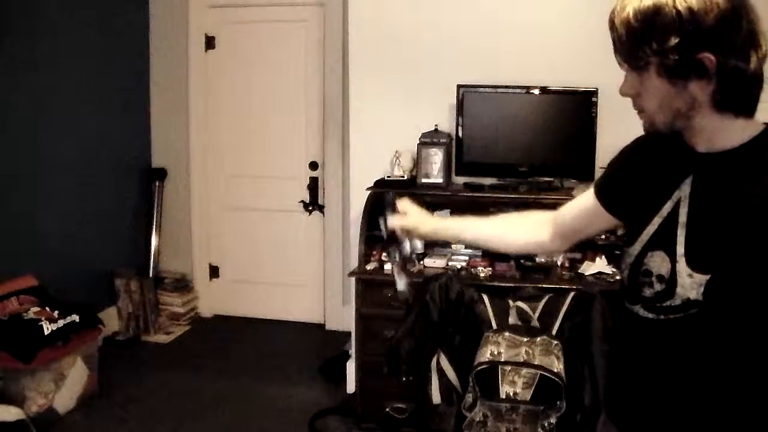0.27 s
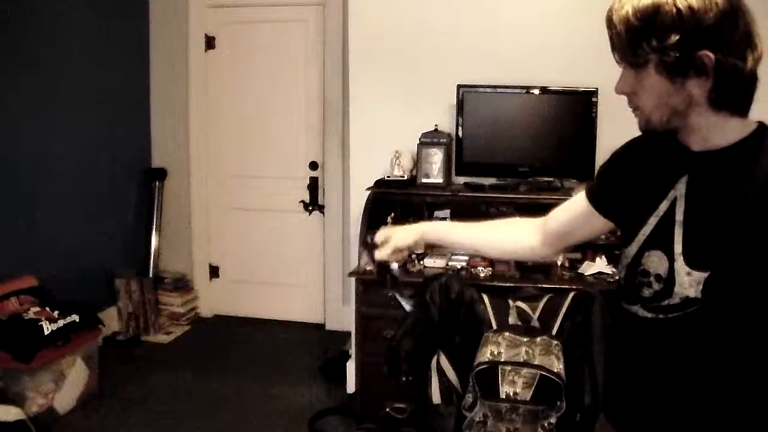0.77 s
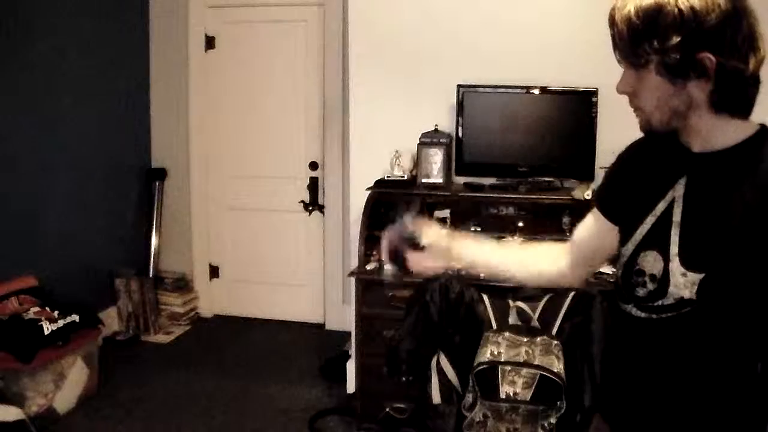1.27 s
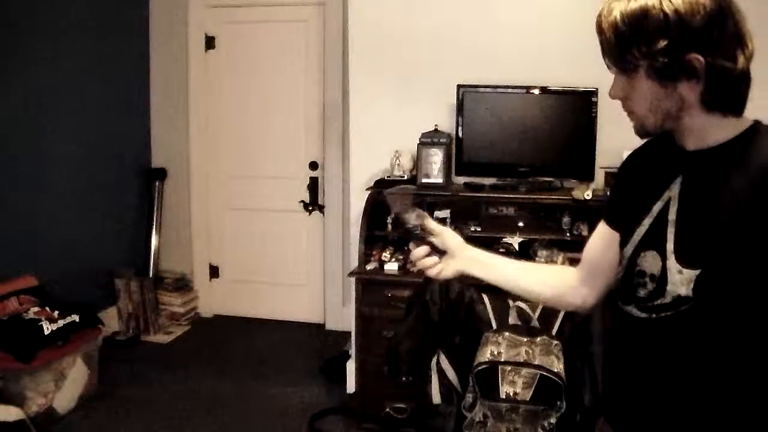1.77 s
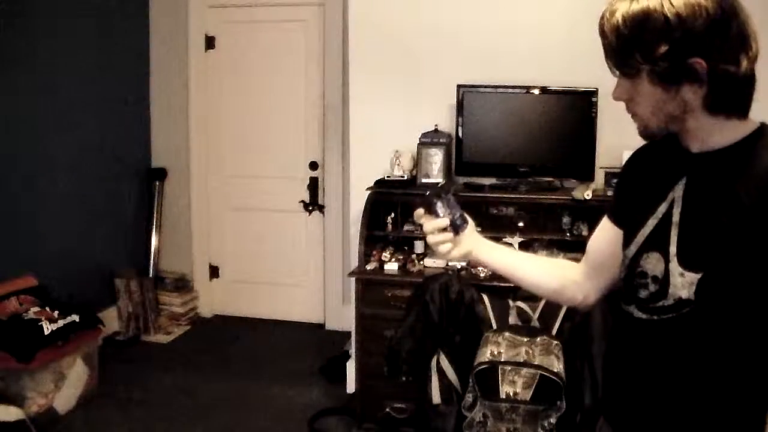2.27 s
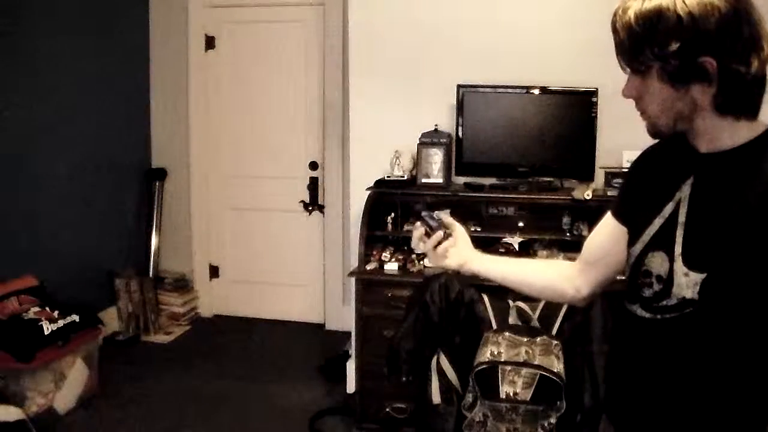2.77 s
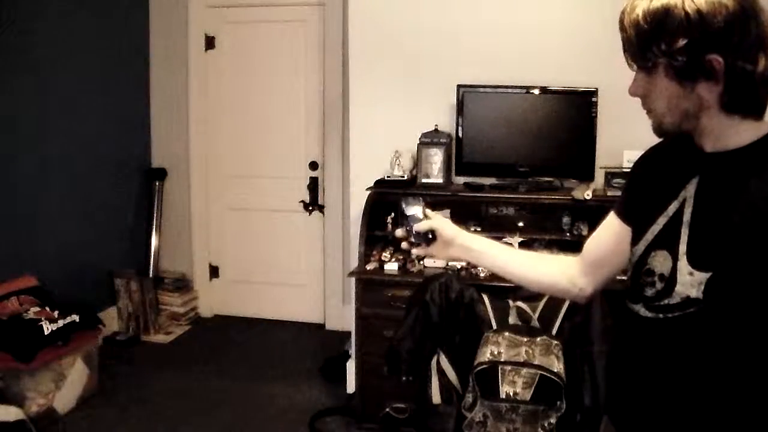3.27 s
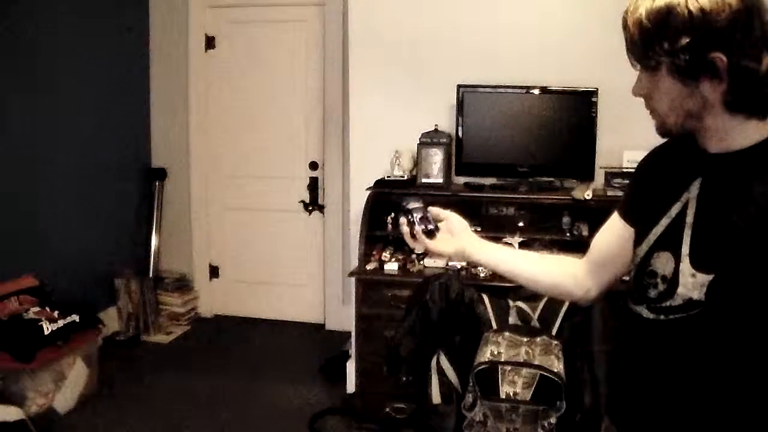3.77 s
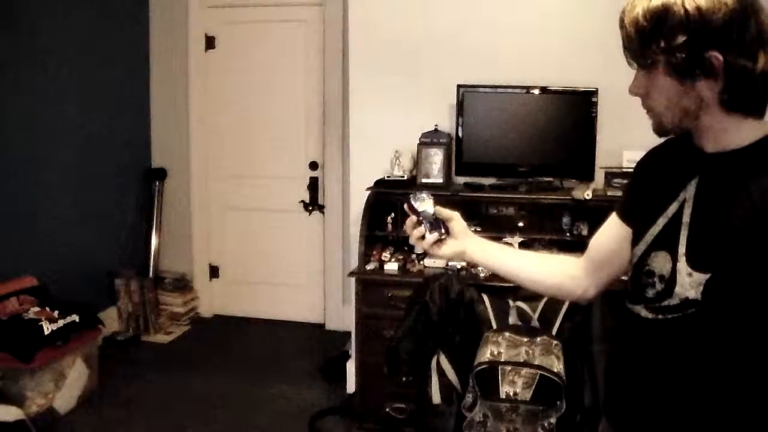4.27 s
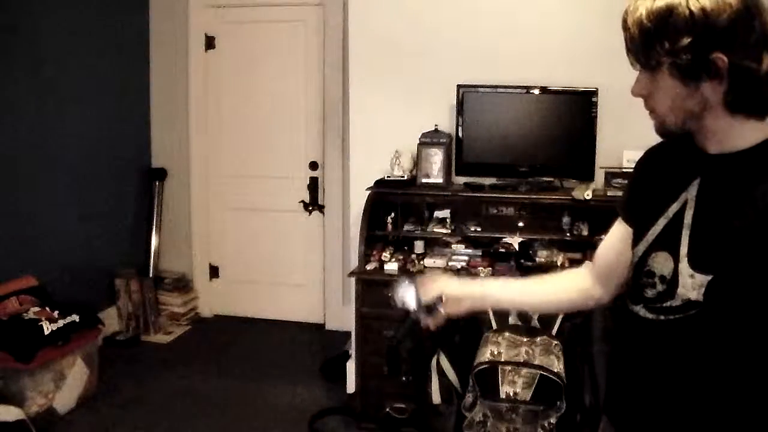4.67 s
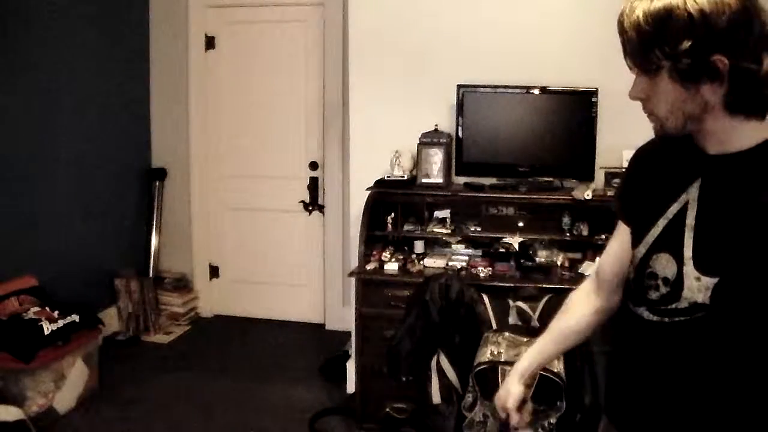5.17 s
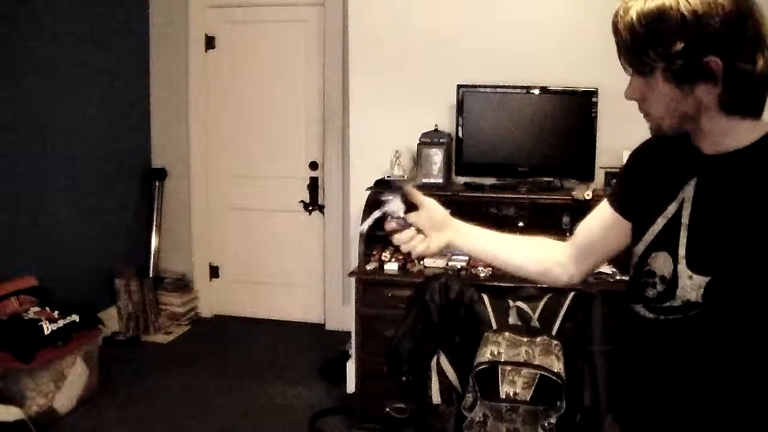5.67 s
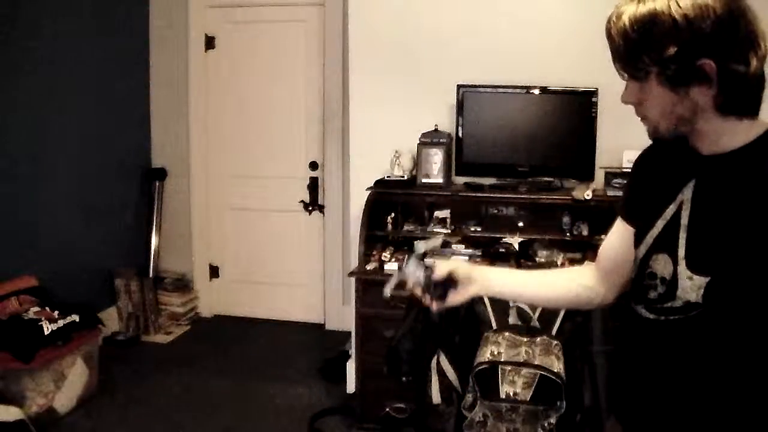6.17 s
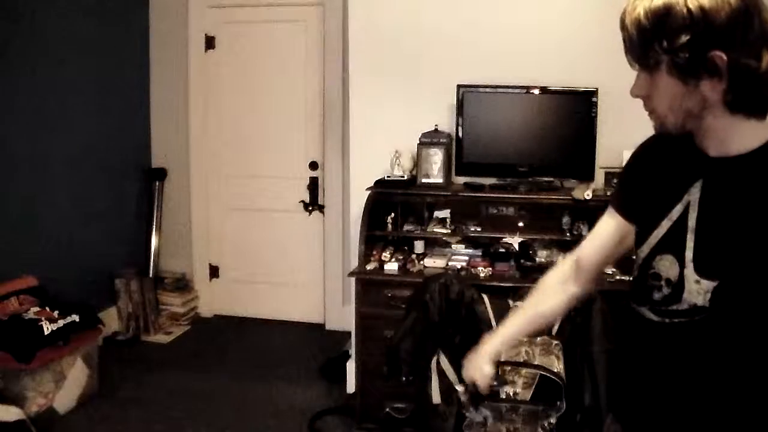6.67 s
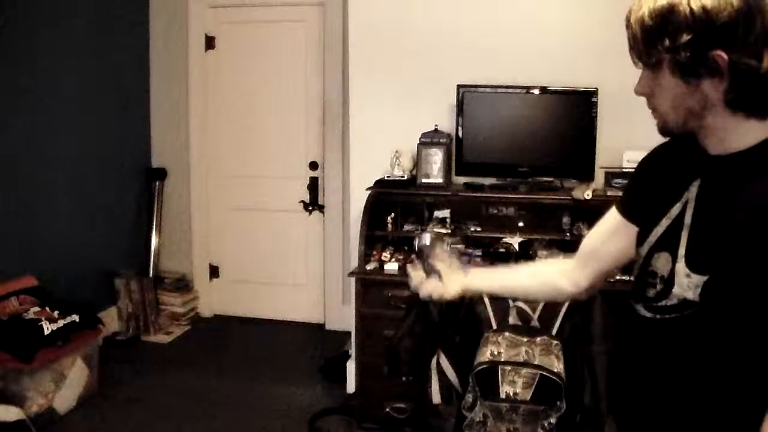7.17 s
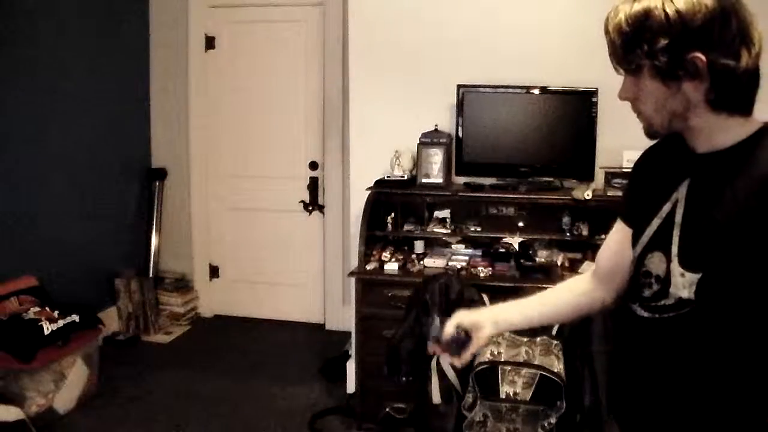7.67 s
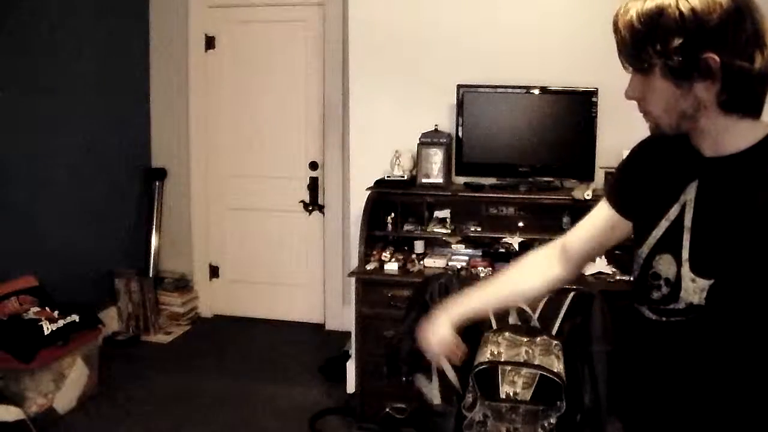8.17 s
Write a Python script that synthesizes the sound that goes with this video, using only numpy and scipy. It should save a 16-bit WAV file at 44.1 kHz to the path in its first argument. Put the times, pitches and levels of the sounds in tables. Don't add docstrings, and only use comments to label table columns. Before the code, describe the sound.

Steady low hum and soft fan-like air fill a furnished room, heard by a camera microphone about two metres from a hinged plastic toy. From 0 to 1 second its loose joints tick faintly. Around 1.3 seconds they chatter brightly, a snap lands at 1.6, and dense rattling leads to a hard double clack at 2.05; the background briefly dips and recovers. Small clicks come near 2.6, 2.9 and 4.1 seconds, with near quiet between. Sharp knocks fall at 4.8 and 4.9, followed by light rattling at 5.2 and 5.5. A quick run of clicks ends in the loudest, crackling clack at 5.9, and the sound drops under for half a second. Rattling builds from 6.9 to a strong snap at 7.3, with a rebound at 7.45. Thin ticks and a loose rattle finish around 8.2. Each hit is dry and bright, with short wall reflections.

```python
import sys
import numpy as np
from scipy import signal
from scipy.fft import rfft, irfft, next_fast_len
from scipy.io import wavfile
from scipy.ndimage import uniform_filter1d

SR = 44100
rng = np.random.default_rng(int(sys.argv[2]) if len(sys.argv) > 2 else 0)


def inscribe(sig):
    pcm = np.round(np.clip(np.atleast_2d(sig).T, -1, 1) * 32767)
    wavfile.write(sys.argv[1], SR, pcm.astype(np.int16))


def boost_factor(decibels):
    exponent = np.asarray(decibels, float) / 20
    return 10 ** exponent


N = 371322


def evened(x):
    return x / np.sqrt(np.mean(x ** 2) + 1e-20)


def peaked(x):
    return x / np.abs(x).max(axis=-1, keepdims=True)


def read(points, hz):
    f, value = np.transpose(points)
    return np.interp(np.log(hz + 1), np.log(f + 1), value)


def add(mix, s, sound):
    part = mix[round(s * SR):][:len(sound)]
    part += sound[:len(part)]


def resonate(x, hz, width):
    r = np.exp(-np.pi * width / SR)
    return 2 * signal.lfilter([1 - r], [1, -r * np.exp(2j * np.pi * hz / SR)], x).real


def dying(rows):
    out = np.zeros(N)
    for s, hz, db, t60 in rows:
        t = np.arange(0, 2 * t60, 1 / SR)
        onset = np.minimum(t * 4000, 1)
        add(out, s, boost_factor(db - 60 * t / t60) * np.cos(2 * np.pi * hz * t) * onset)
    return out


# frequency in Hz, level in dB per Hz.
AIR_COLOUR = [(12, -35), (20, 0.5), (54, -7), (163, -10), (261, -9), (308, -10), (520, -14), (614, -13.5),
              (724, -13.5), (787, -15.5), (1190, -18), (13500, -35), (14700, -36.5)]
# frequency in Hz, likeness from 0 to 1.
AIR_SAME = [(60, .7), (130, 0.53), (290, 0.82), (630, 0.8), (1370, 0.78), (2980, 0.23), (6510, 0.01),
            (14200, 0.03)]
# frequency in Hz, left minus right in dB.
AIR_BALANCE = [(60, 6), (110, 2.5), (200, 1), (370, -0.5), (680, -1.5), (1250, -0.5), (2300, -0.5),
               (4220, 0), (7750, 0), (14200, -1)]


def air():
    frames, hz = N // 512 + 5, np.fft.rfftfreq(2048, 1 / SR)
    a, b, c, d, patches = rng.standard_normal((frames, 1025, 5)).T
    patches = uniform_filter1d(patches, 16, axis=0)
    patches = evened(uniform_filter1d(patches, 6, axis=1))
    same = np.clip(read(AIR_SAME, hz), -1, 1)[:, None]
    left, other = a + 1j * b, c + 1j * d
    right = same * left + np.sqrt(1 - same ** 2) * other
    lean = boost_factor(read(AIR_BALANCE, hz)[:, None] / 2)
    z = np.array([left * lean, right / lean])
    z *= boost_factor(read(AIR_COLOUR, hz)[:, None] + 1.74 * patches)
    wash = signal.istft(z, nperseg=2048, noverlap=1536)[1][:, :N]
    return boost_factor(-53.5) * evened(wash)


# frequency in Hz, steady tone in dB, halo width in Hz, halo level in dB.
HUM = [(30.1, -53.5, 6.2, -66.5), (59.1, -57, 4, -62), (118.1, -60, 6, -72), (306, -98, 26, -65.5),
       (394.4, -89, 81, -63.5), (537, -99, 55, -68.5), (719.3, -65.5, 22.6, -69)]


def hum():
    t, noise = np.arange(N) / SR, rng.standard_normal(N)
    out = np.zeros(N)
    for hz, steady_db, width, halo_db in HUM:
        halo = resonate(resonate(noise, hz, width), hz, width)
        out += boost_factor(steady_db - 1.0) * np.sin(2 * np.pi * hz * t) + boost_factor(halo_db) * evened(halo)
    return out * boost_factor(np.array([[.9], [-.9]]))


# delay in ms, level in dB.
ECHOES = [(3.1, -6), (5.2, -10.5), (6.3, -26), (11.3, -7.5), (16.2, -51), (21.5, -9.5)]
# frequency in Hz, t60 in seconds.
ROOM_T60 = [(500, 0.3), (1500, 0.44), (3000, 0.42), (6000, 0.39), (12000, 0.2)]
# frequency in Hz, level in dB.
TAIL_COLOUR = [(700, 3.5), (1500, -7.5), (3000, -2.5), (6000, -3.5), (12000, 4.5)]
# frequency in Hz, extra level in dB.
TAIL_RIGHT = [(3000, 0.35), (8000, 1), (13000, 3.5)]


def room(x):
    taps = np.zeros((2, SR // 2))
    grid = np.arange(200, SR // 2 - 20, 20)
    at = grid + rng.integers(0, 20, (2, (SR // 2 - 201) // 20))
    np.put_along_axis(taps, at, rng.choice([-1., 1.], at.shape), 1)
    hz, t, z = signal.stft(taps, SR, nperseg=256)
    same = read([(1500, 0.94), (2500, 0.86), (4500, 0.2), (9000, 0.17)], hz)
    same = np.clip(same, 0, 1)[:, None]
    z[1] = same * z[0] + np.sqrt(1 - same ** 2) * z[1]
    z[1] *= boost_factor(read(TAIL_RIGHT, hz))[:, None]
    decay_db = read(TAIL_COLOUR, hz)[:, None] - 60 * t / read(ROOM_T60, hz)[:, None]
    tail = signal.istft(z * boost_factor(decay_db), SR, nperseg=256)[1]
    tail *= boost_factor(3.0) / np.linalg.norm(tail[0])
    lag = -0.15
    tail[0, 4] = 1
    tail[1, :9] = boost_factor(.8) * np.sinc(np.arange(9) - 4 - lag) * np.hanning(13)[2:11]
    for k, (ms, db) in enumerate(ECHOES):
        i = round(ms * SR / 1000)
        tail[0, i] += boost_factor(db)
        tail[1, i + (-1) ** k] += boost_factor(db)
    return signal.fftconvolve(x[None], tail, axes=1)[:, :N]


# start in seconds, drop in dB, hold in seconds, climb in seconds.
DUCKS = [
    (2.046, 13, 0.073, 0.18),
    (4.94, 1.5, 0.21, 0.24),
    (5.9044, 17.5, 0.41, 0.16),
    (7.286, 6, 0.2, .1),
    (7.461, 8.5, 0.24, 0.25),
]


def ducking_db():
    t, fall_s = np.arange(N) / SR, .003
    drops = [db * np.interp(t, [s, s + fall_s, s + hold, s + hold + climb], [0, 1, 1, 0])
             for s, db, hold, climb in DUCKS]
    return np.max(drops, axis=0)


# start in seconds, peak in dB.
PUSHES = [
    (1.5686, -40),
    (2.0469, -15),
    (4.8249, -48),
    (4.9264, -51),
    (5.9052, -28),
    (7.2866, -47),
    (7.4512, -42),
]


def pushes():
    return dying([(s, 750, db, .004) for s, db in PUSHES])


# start in seconds, length in seconds, level in dB,
# growth over the swing in dB, ringing of the open arms in dB.
SWINGS = [(0, 0.46, -59.5, -4, 5.5), (0.278, 0.098, -51.5, -4, 5), (.4, .18, -64, -1, 6),
          (.62, 0.077, -69.5, 10.5, 7), (0.825, 0.14, -49.5, -1, -2), (1.268, 0.15, -38.5, 4.5, -5),
          (1.453, 0.11, -45.5, 0.5, -3.5), (1.554, .24, -40, -0.5, -6.5), (1.82, 0.18, -42.5, -1.5, -5),
          (2.001, .13, -38.5, -0.5, -5), (4.74, .03, -62, -14, 0), (4.88, .07, -76, 8, -3),
          (5.22, 0.098, -65.5, 11, 9.5), (5.29, .17, -49, -13, 0.5), (5.48, 0.2, -60, 5, 2),
          (5.75, 0.16, -58, 14.5, -3), (6.868, 0.39, -68, 25.5, -2), (7.361, 0.04, -53, 12, -8),
          (7.72, 0.64, -65.5, 9.5, -7), (8.148, 0.064, -45, 2.5, -3)]
# frequency in Hz, level in dB per Hz.
RATTLE_COLOUR = [(470, -32.5), (800, -12), (1330, 3), (2280, -5.5), (2640, 7.5), (5820, 4.5), (8390, -4.5),
                 (11800, -5), (14200, -16.5), (14700, -29.5)]
# frequency in Hz, level in dB.
ARMS = [(2640, 0.5), (2830, 3), (3300, -1.5), (3750, -0.5), (4720, -1.5), (5050, -3.5), (5850, -0.5),
        (7300, -6)]


def rattle():
    rise_s, fall_s = 0.0065, 0.0067
    level, ringing = np.zeros((2, N))
    for s, length, db, growth_db, ring_db in SWINGS:
        t = np.arange(0, length + fall_s, 1 / SR)
        swing = np.clip(np.minimum(t / rise_s, t[::-1] / fall_s), 0, 1)
        swing = swing * boost_factor(db + growth_db * t / length)
        add(level, s, swing)
        add(ringing, s, swing * boost_factor(ring_db))
    sizes = boost_factor(3.4 * np.minimum(rng.exponential(1, N), 4))
    struck = rng.random(N) < 1600 / SR
    ticks = sizes * struck * rng.choice([-1, 1], N)
    size = next_fast_len(N)
    colour = boost_factor(read(RATTLE_COLOUR, np.fft.rfftfreq(size, 1 / SR)))
    plain = irfft(rfft(ticks, size) * colour, size)[:N]
    arm = np.arange(N) % len(ARMS)
    rung = sum(boost_factor(db) * resonate(ticks * (arm == k), hz, 160) for k, (hz, db) in enumerate(ARMS))
    return boost_factor(ducking_db() - 12) * (level * evened(plain) + ringing * evened(rung))


# start in seconds, frequency in Hz, peak in dB.
PINGS = [(1.2807, 5050, -43), (1.3024, 3700, -39), (1.3351, 4820, -38), (1.3496, 4740, -41),
         (1.3605, 4910, -32), (1.383, 6980, -36), (1.3917, 4650, -36), (1.405, 3880, -38),
         (1.4069, 2700, -40), (1.4077, 5040, -39), (1.568, 7240, -32), (1.5692, 4240, -29.5),
         (1.6377, 5640, -39), (1.8249, 7440, -35), (1.9983, 3530, -31), (2.0034, 6030, -35),
         (2.0114, 2840, -35), (2.0331, 5680, -36), (2.0455, 6290, -31), (2.0745, 5940, -40),
         (2.1028, 2640, -32), (2.6289, 4070, -40), (2.8517, 4570, -41), (2.856, 6720, -33),
         (2.8662, 4650, -42), (2.8669, 3380, -39), (2.8712, 6890, -44), (2.8821, 5920, -39),
         (4.099, 5800, -47), (4.1525, 8960, -45), (4.1687, 2500, -36), (4.792, 5040, -32),
         (4.8268, 7200, -37), (4.8326, 3100, -37), (4.8529, 5800, -44), (4.9255, 4530, -30.5),
         (4.9259, 2480, -28), (4.9465, 2670, -44), (4.9538, 4700, -46), (5.2152, 7540, -42),
         (5.2883, 4740, -41), (5.3057, 2580, -44), (5.8579, 5870, -30), (5.8819, 7400, -33),
         (5.8848, 4910, -34), (5.8862, 3620, -36), (5.8891, 2580, -38), (5.9034, 7600, -31),
         (5.9232, 5250, -35), (5.9239, 2500, -35), (5.9247, 3360, -35), (7.2039, 8870, -42),
         (7.2214, 2760, -36), (7.2961, 2500, -37), (7.3055, 5340, -36), (7.3694, 2580, -37),
         (7.4507, 2350, -29), (7.4688, 2410, -38), (7.4813, 2240, -39), (8.1654, 5860, -38)]
# start in seconds, frequency in Hz, peak in dB.
FAINT_PINGS = [(0.1487, 2840, -47), (0.2336, 2760, -47), (0.325, 2835, -43), (0.3424, 2840, -45),
               (0.498, 3190, -51), (0.535, 2840, -45), (0.8939, 7240, -54), (0.9019, 3030, -45),
               (0.9237, 5860, -53), (0.952, 3880, -49), (0.9534, 3100, -48), (1.2741, 5030, -42),
               (1.277, 6630, -46), (1.2792, 5680, -46), (1.2843, 5770, -43), (1.2988, 8700, -46),
               (2.0346, 7410, -42), (2.6282, 7150, -55), (2.634, 8870, -54), (2.6419, 3350, -51),
               (2.6637, 4130, -53), (2.88, 7670, -51), (2.8887, 2580, -41), (2.8908, 6800, -50),
               (2.9808, 4910, -50), (2.9808, 5860, -49), (4.0751, 2760, -39), (4.1012, 6980, -51),
               (4.1716, 7580, -52), (4.956, 2070, -46), (5.2121, 2660, -44), (5.2368, 2650, -47),
               (5.2382, 8010, -57), (5.3079, 4740, -46), (5.552, 2670, -46), (5.5517, 5860, -53),
               (5.5916, 7490, -54), (5.6047, 3880, -48), (5.9312, 8440, -47), (6.9115, 5170, -53),
               (6.913, 4480, -53), (7.0046, 3080, -45), (7.0117, 2650, -46), (7.1314, 6120, -45),
               (7.3084, 7580, -43), (7.4673, 7410, -50), (8.1487, 3880, -47), (8.1618, 7410, -54),
               (8.214, 2830, -48), (8.2191, 4650, -49)]


def pings():
    hard = [(*row, 0.024) for row in PINGS]
    faint = [(*row, 0.035) for row in FAINT_PINGS]
    return boost_factor(ducking_db()) * dying(hard + faint)


# start in seconds, frequency in Hz, peak in dB, t60 in seconds.
TONES = [(.325, 2800, -45, .06), (.94, 5780, -43, .04), (1.569, 1255, -32, 0.018), (1.825, 5820, -40, .06),
         (2.05, 3480, -14, 0.033), (2.621, 4900, -46, .015), (2.628, 3990, -39, .022),
         (2.849, 2240, -28, 0.018), (2.9572, 2040, -26, 0.012), (2.958, 3340, -36, 0.033),
         (4.082, 5790, -33, 0.032), (4.152, 3200, -29, 0.015), (4.1523, 2320, -22.5, 0.0085),
         (4.154, 5860, -29.5, .018), (4.793, 1850, -28.5, .016), (4.803, 5800, -36, .015),
         (4.826, 5600, -27, .016), (4.826, 4970, -29, .016), (4.9265, 2080, -24.5, .008),
         (4.9292, 1800, -27, .008), (4.9292, 4200, -31, .008), (5.536, 2990, -41, .02),
         (5.872, 4550, -26.5, 0.038), (5.9047, 2380, -7.5, 0.0078), (7.1, 3200, -37, .012),
         (7.2862, 3400, -18, .01), (7.2862, 4700, -24, .008), (7.287, 1510, -29.5, .008),
         (7.307, 2680, -20, .013), (7.315, 2650, -27, .014), (7.4513, 1880, -19.5, 0.014),
         (7.452, 5800, -23, .04), (8.148, 5790, -39.5, .08)]


def arm_tones():
    return dying(TONES)


# frequency in Hz, level in dB.
SHELL = [(2050, -35), (2690, 0), (3500, -4.5), (4650, -6), (5100, 4), (5810, 6), (7200, -22), (9900, 4)]
# lower edge in Hz, upper edge in Hz.
PARTS = [(1380, 2350), (2350, 4200), (4200, 7500), (7500, 15000)]


def clack(bounces, knock_db, panel_db, edges_db, chance):
    shell_t60 = .016
    weights = boost_factor(3 * chance[:, :len(SHELL)].T)
    ring = sum(w[:, None] * boost_factor(db) * resonate(bounces, hz, 6.1 / shell_t60)
               for w, (hz, db) in zip(weights, SHELL))
    shaken = bounces + boost_factor(-3.5) * ring
    gains = boost_factor(knock_db), -np.ones(len(bounces)), boost_factor(panel_db), -boost_factor(edges_db)
    out = 0
    for gain, band in zip(gains, PARTS):
        part = signal.lfilter(*signal.butter(N=2, Wn=band, btype="band", fs=SR), shaken)
        out = out + gain[:, None] * peaked(part)
    return out


# start in seconds, body peak in dB, then hollow knock,
# bright panel and thin edges in dB against the body.
SNAPS = [(1.2743, -43, -13, 11, 17.5), (1.382, -28.5, -10, 3, 5.5), (1.5687, -26.5, -10, 6, 7.5),
         (1.9984, -26, -12.5, -1, -5), (2.0434, -16.5, -1.5, -12, -5), (2.0469, -11, -4.5, 0.5, -2),
         (2.8439, -38.5, 8, -15, -15), (2.8483, -36, 1, 9, -1), (2.957, -30.5, 2, -5, -6),
         (4.1513, -26.5, -8, -8, -7), (4.7930, -27.5, -11, 3, -10), (4.8249, -25.5, 3, 1.5, -3),
         (4.9259, -23.5, -6, 4.5, -1), (4.9317, -30.5, 3.5, 5, 12), (5.2030, -33, -4, -9, -22),
         (5.5348, -29.5, -25, -10, -7.5), (5.9047, -10.5, -18, -1.5, -5), (6.9973, -34, -7, -0.5, -3),
         (7.2862, -12.5, -8, -10, -4.5), (7.3080, -23.5, -12, -5, -15), (7.4513, -24.5, -29, 2.5, -1.5),
         (7.5393, -41, 8, -4, -10)]


def snaps():
    ms, bounce_ms = np.arange(2048) * 1000 / SR, 0.74
    start_s, peak_db, knock_db, panel_db, edges_db = np.transpose(SNAPS)
    shake, chance = np.moveaxis(rng.standard_normal((len(SNAPS), 2, 2048)), 1, 0)
    blows = (ms == 0) + 0.3 * shake ** 3 * np.exp(-ms / bounce_ms)
    return start_s, peak_db, clack(blows, knock_db, panel_db, edges_db, chance)


# start in seconds, body peak in dB, hollow knock in dB against
# the body, brightness in dB against the body.
CHATTER = [(.146, -54, -8, 2), (.173, -55, -13.5, -7), (.21, -43, -26, -13), (0.217, -43, -23, -1.5),
           (0.273, -42, -15, -3), (.286, -42.5, -18, 1.5), (.323, -39.5, -9, -6),
           (0.432, -41.5, -24, -5.5), (.481, -51, -28, 1.5), (.52, -39, -14, -9),
           (0.645, -49.5, -15, -26), (0.836, -49, -25, -15), (.845, -55, -17, -5),
           (.894, -39.5, -17, -4), (0.939, -42, -28, -3), (1.297, -33, -26, -0.5), (1.307, -40, -19, -5),
           (1.335, -38, -20, 3), (1.359, -31, -8, -4), (1.385, -35, -29, 1), (1.397, -27, -8, -5),
           (1.415, -39.5, -22, 6), (1.528, -57, -13, -6),
           (1.57, -34, -0.5, 5), (1.61, -29, -21, -6), (1.644, -40, -24, -2), (1.692, -31.5, -27, -3),
              (1.699, -36, -26, 3.5), (1.726, -35, -9, 2), (1.731, -26.5, -26, -2.5),
              (1.745, -45, -13, 13.5), (1.774, -56, -8, -2), (1.823, -41, -10, 11), (1.923, -41.5, -22, 0),
              (2, -30, -6, 5.5), (2.058, -23.5, -28, -20), (2.074, -24.5, -11.5, -36),
              (2.627, -39.5, -14, -4.5), (2.699, -50, -2, 2), (2.854, -33.5, 2, 3.5),
              (2.861, -37, -12, -15), (2.966, -41.5, -23, -5), (3.649, -44.5, -2, -21),
              (3.748, -50.5, 1, -11), (3.778, -54.5, 6, -13), (3.94, -53.5, -1, -21),
              (4.07, -41.5, 0.5, -5), (4.079, -38, -1, 0.5), (4.098, -41.5, 6, -8), (4.154, -38, 7.5, 2.5),
              (4.26, -40.5, -9, -12),
           (4.747, -54.5, 5, 8), (4.773, -56, 5, 6), (4.798, -51, 5, -4), (4.826, -43.5, -10, 12),
                  (5.148, -53, -1, -6), (5.212, -42, -1, 5.5), (5.289, -37, -10, -1),
                  (5.381, -43.5, -27, -9), (5.515, -51, -12, -6), (5.527, -47, -20, -10),
                  (5.593, -36, -15, -6), (5.751, -52.5, -9, 1.5), (5.81, -41, -14, -1),
                  (5.8556, -33, 0, 10.5), (5.873, -32, -3.5, 6), (5.884, -33, -14, 11),
                  (5.897, -30, -10.5, 4), (5.908, -31.5, 0.5, 1.5), (6.516, -50.5, -10.5, -5),
                  (6.539, -48, -17, -1), (6.751, -49.5, -16, -9),
           (6.911, -43.5, -16, 0.5), (7.0997, -39, -32, -11), (7.129, -40, -7, 0.5),
             (7.172, -37, -17, -9), (7.182, -36.5, -9, -4.5), (7.2, -36, -16, 0.5), (7.209, -30, -16, -18),
             (7.225, -44, -13, -2), (7.257, -54, -10, -7), (7.294, -41, -7, 5), (7.315, -35.5, 1.5, -6),
             (7.434, -48, -6, 3), (7.467, -40, -16, -2), (7.483, -41.5, 2.5, 0), (7.616, -58, 5.5, 1.5),
             (7.715, -58.5, -1, 8), (7.743, -58.5, 2, 1), (7.814, -51.5, -5, -4), (7.833, -58, -11, -3),
             (7.853, -49, -19, -3), (7.874, -57, -2, -4), (8.146, -37.5, -5.5, -3.5), (8.154, -43, -22, -6),
             (8.171, -37, -24, -11), (8.379, -56, -4, -9)]


def chatter():
    ms, bounce_ms = np.arange(2048) * 1000 / SR, 2.46
    start_s, peak_db, knock_db, bright_db = np.transpose(CHATTER)
    shake, chance = np.moveaxis(rng.standard_normal((len(start_s), 2, 2048)), 1, 0)
    u = ms / bounce_ms
    bounces = shake * abs(shake) * u ** 0.85 * np.exp(-u)
    return start_s, peak_db, clack(bounces, knock_db, bright_db, bright_db, chance)


def clacks():
    out, lift = np.zeros(N), boost_factor(ducking_db())
    for blows in (snaps(), chatter()):
        for s, db, sound in zip(*blows):
            add(out, s, boost_factor(db) * lift[round(s * SR)] * sound)
    return out


def scene():
    toy = rattle() + pings() + arm_tones() + clacks()
    return air() + hum() + pushes() + room(toy)


# start in seconds, level in dB, decay in seconds.
SETTLE = [
    (2.049, -47, 0.035),
    (5.908, -51, 0.087),
]


def settling():
    return dying([(s, 0, db, decay * np.log(1000)) for s, db, decay in SETTLE])


def band_limit(x):
    return signal.sosfilt(signal.butter(12, 14830, fs=SR, output="sos"), x)


def record(dry):
    hiss = boost_factor(-68) * rng.standard_normal(dry.shape)
    gained = dry / boost_factor(ducking_db()) + hiss + settling()
    band_edge = signal.firwin(255, 14300, window=("kaiser", 5), fs=SR)
    mix = signal.oaconvolve(gained, band_edge[None], "same")
    return band_limit(mix)


dry = scene()
out = record(dry)
inscribe(out)
```